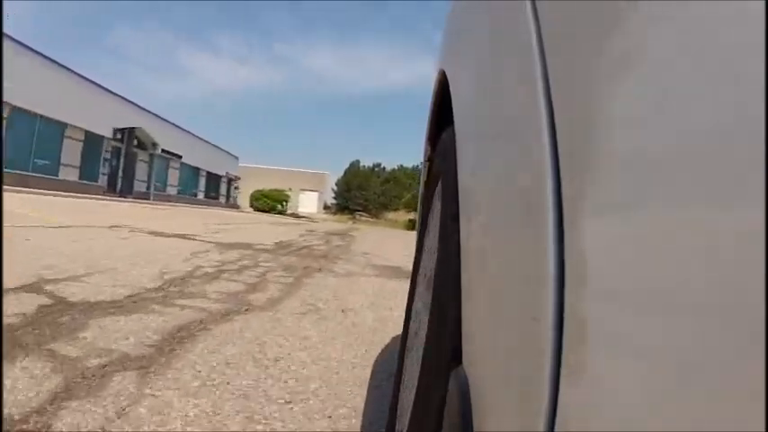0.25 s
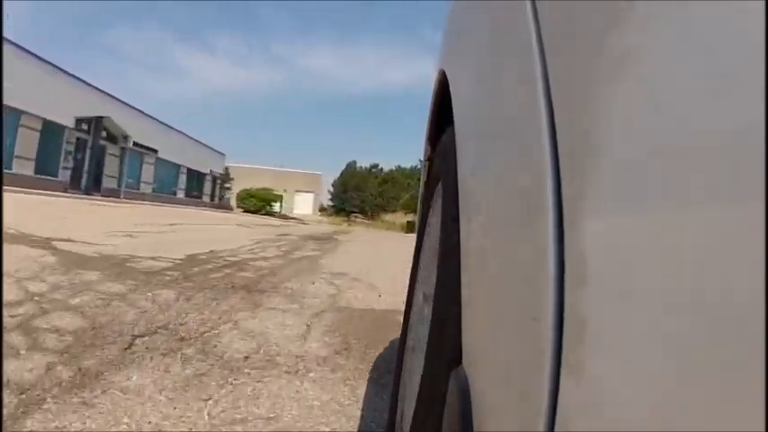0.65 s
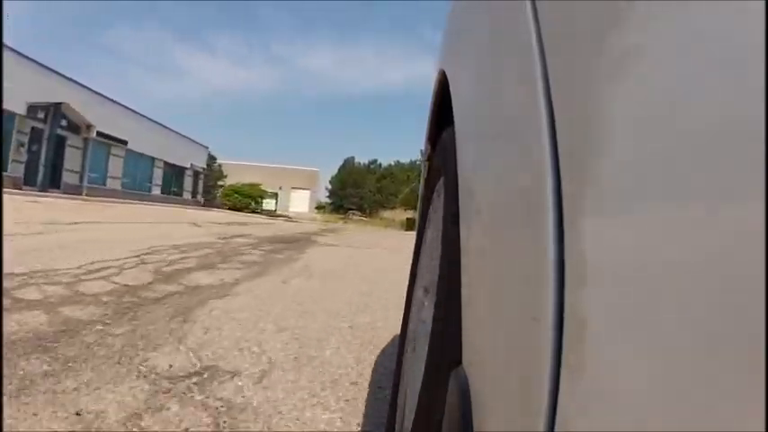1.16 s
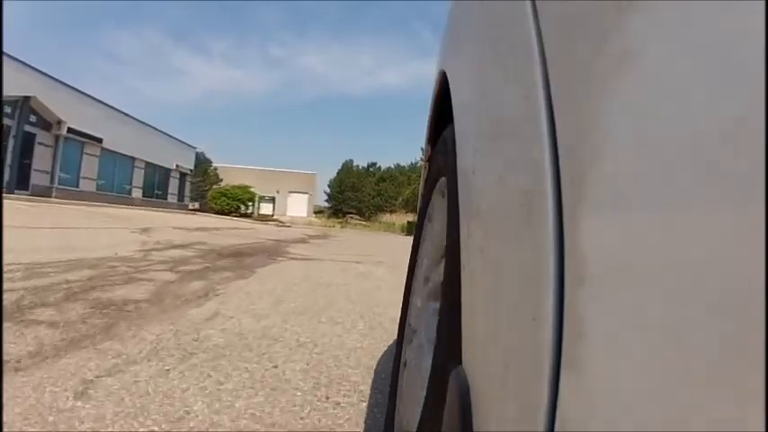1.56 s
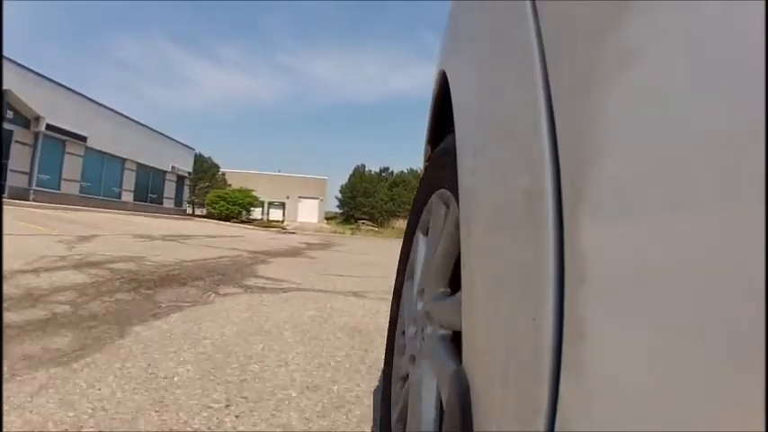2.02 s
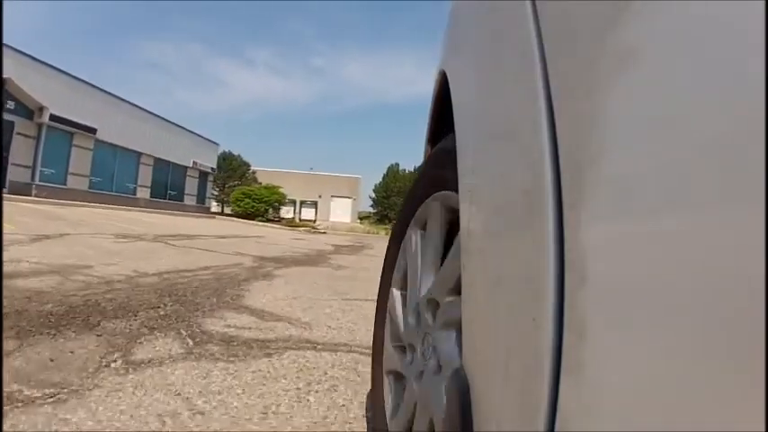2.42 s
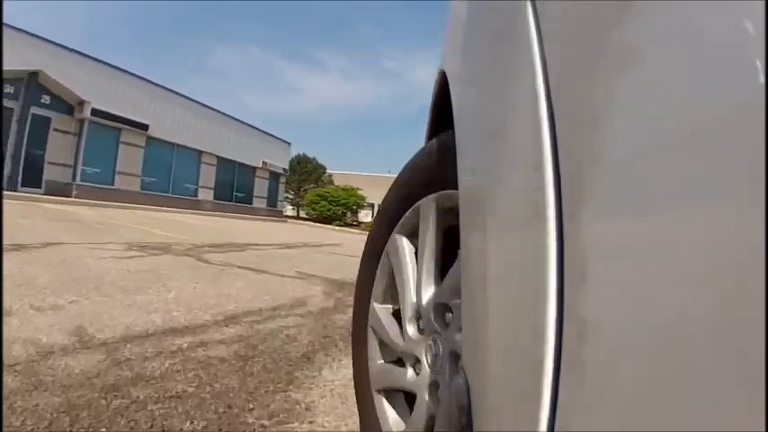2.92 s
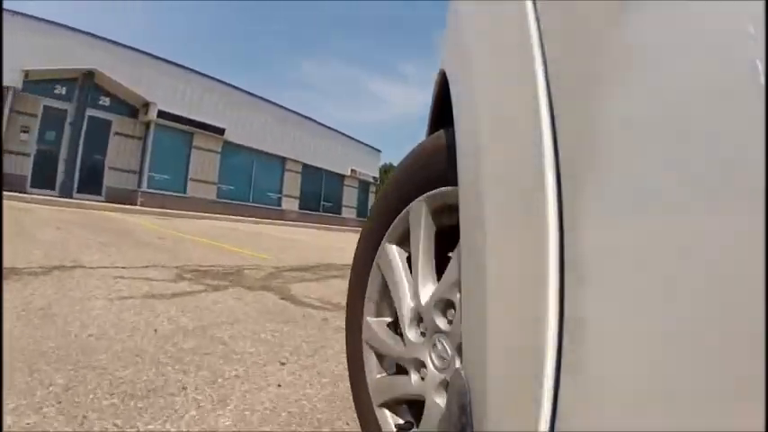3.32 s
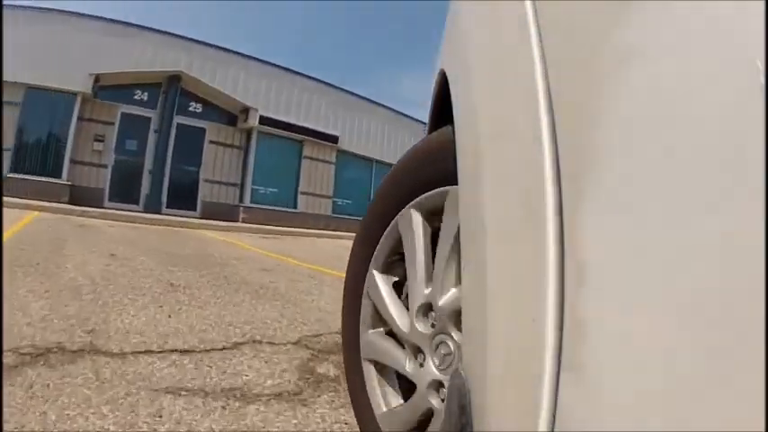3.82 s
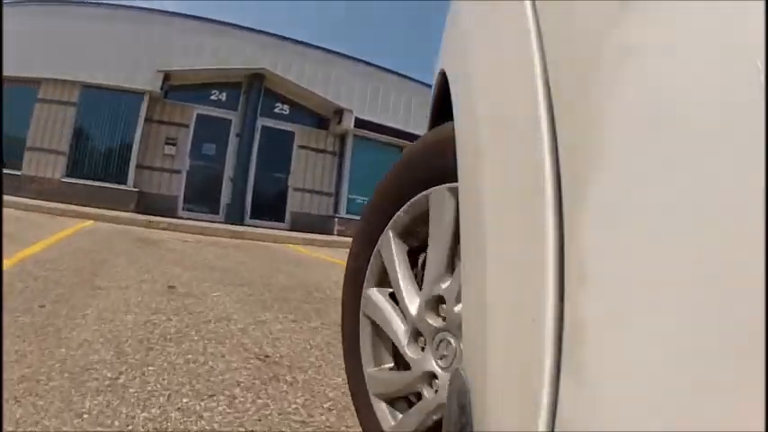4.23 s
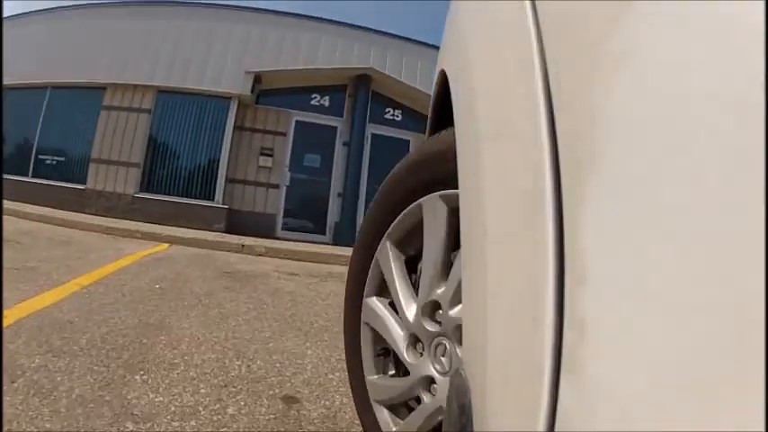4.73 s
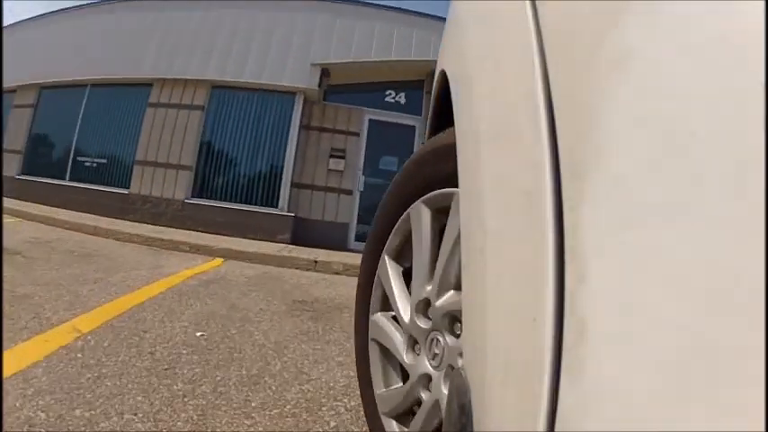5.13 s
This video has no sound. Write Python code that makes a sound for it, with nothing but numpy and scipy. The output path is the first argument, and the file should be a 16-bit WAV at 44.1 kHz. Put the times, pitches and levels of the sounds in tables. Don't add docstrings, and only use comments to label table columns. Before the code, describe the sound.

A microphone in a closed housing on a car door hears the front tyre rolling slowly over cracked asphalt outdoors. The dull rumble wavers and bumps, with gravel crackle and crunching stones. Pops against the panel begin near one second and become hardest at about 4.3 and 5 seconds, while the rumble eases and rubbing brake metal whines faintly.

```python
import sys
import numpy as np
from scipy import signal
from scipy.io import wavfile

SR = 44100
rng = np.random.default_rng(int(sys.argv[2]) if len(sys.argv) > 2 else 0)


def to_wav(s):
    ch = np.atleast_2d(s).T
    pcm = np.round(np.clip(ch, -1, 1) * 32767)
    wavfile.write(sys.argv[1], SR, pcm.astype(np.int16))


def amplitude_ratio(level_db):
    exponent = np.asarray(level_db, float) / 20
    return 10 ** exponent


N = 236860

ROLL_SHARE = [0.57, 1.56, 0.24, 0.15]


def rms_one(x):
    return x / np.sqrt(np.mean(x ** 2) + 1e-20)


def drift(rate_hz):
    pole = np.exp(-80 * np.pi * rate_hz / SR)
    slow = signal.lfilter([1], [1, -2 * pole, pole * pole], rng.standard_normal(N // 40 + 2002))
    slow = slow[2000:]
    return np.interp(np.arange(N) / 40, np.arange(len(slow)), rms_one(slow))


def band(x, low_hz, high_hz):
    return signal.sosfilt(signal.butter(2, [low_hz, high_hz], "band", fs=SR, output="sos"), x)


def mode(hz, t60_s, phase, length=8192):
    t = np.arange(length) / SR
    return np.sin(2 * np.pi * hz * t + phase) * amplitude_ratio(-60 * t / t60_s)


def add(track, start_s, sound):
    i = round(start_s * SR)
    track[i:i + len(sound)] += sound[:N - i]


def window(start_s, length_s, edge_s):
    t = np.arange(N) / SR - start_s
    return np.clip(np.minimum(t, length_s - t) / edge_s, 0, 1)


def swells(rows):
    t = np.arange(N) / SR
    lifts = [db * np.clip(1 - np.abs(t - peak_s) / half_s, 0, 1) for peak_s, db, half_s in rows]
    return np.max(lifts, axis=0)


def work_db():
    # time_s, level_db
    road_work = [(0.0, -51.5), (0.12, -53), (0.48, -54), (0.67, -55), (0.87, -54), (0.99, -56),
                 (1.56, -53.5), (1.82, -57), (2.23, -53), (2.42, -55.5), (3.22, -54.5), (3.62, -55.5),
                 (4.1, -56.5), (4.41, -55), (4.59, -56.5), (4.94, -58.5), (5.1, -60), (5.37, -59.5)]
    time_s, db = np.transpose(road_work)
    db = np.interp(np.arange(N) / SR, time_s, db)
    return db - db.mean()


def rolling():
    part_hz = [56, 95, 800, 3500]
    # pitch_hz, density_db (per Hz)
    road_colour = [(14, -12.5), (48, 0.5), (110, -6), (210, -9), (500, -18), (1820, -34), (7000, -41.5),
                   (9500, -75)]
    # peak_s, over_calm_db, half_length_s
    jolts = [(.12, 2, 0.11), (.48, -5, 0.085), (1.06, 5, .2), (1.58, 15.5, 0.16), (2.33, 12, 0.14),
             (2.59, 2, 0.064), (3.38, 19, 0.14), (3.52, 11.5, 0.14), (3.85, 10, 0.37), (4.2, 5, 0.21),
             (4.55, 7, 0.16)]
    # peak_s, over_bare_surface_db, half_length_s
    gravel_patches = [
        (.01, 12.5, 0.058),
        (.48, 7.5, 0.21),
        (1.56, 2.5, 0.3),
        (2.1, 5, 0.2),
        (5.04, 6, 0.17),
    ]
    sway, body, tread, grit = np.outer(ROLL_SHARE, work_db())
    gravel = swells(gravel_patches)
    scrub_db = 6.5 * (np.arange(N) / SR > 0.97)
    parts = np.array([sway + swells(jolts), body, tread + 0.11 * gravel, grit + gravel + scrub_db])
    parts -= parts.mean(axis=1, keepdims=True)

    impacts = rng.standard_normal((2, N)) * amplitude_ratio(2.07 * rng.exponential(1, (2, N)))
    bumps = drift(25.0)
    colour_hz, density_db = np.transpose(road_colour)
    third_octaves_hz = 20 * 2 ** (np.arange(26) / 3)
    out = 0
    for k, (low_hz, high_hz) in enumerate(zip(third_octaves_hz, third_octaves_hz[1:])):
        place = np.log(low_hz * high_hz) / 2
        colour_db = np.interp(place, np.log(colour_hz), density_db)
        nearness = [np.interp(place, np.log(part_hz), row) for row in np.eye(len(part_hz))]
        unsteady_db = (2.34 * bumps + 1.93 * drift(6.2)) * min(high_hz / 300, 1)
        gain = amplitude_ratio(colour_db + nearness @ parts + unsteady_db)
        out = out + gain * band(impacts[k % 2], low_hz, high_hz)
    return amplitude_ratio(-54.0) * rms_one(out)


def carcass():
    # pitch_hz, width_hz, level_db
    resonances = [(89.6, 9.2, 5.5), (150.6, 15.3, -1), (185.6, 19, -3), (224.2, 19.8, -2), (319, 17, -7.5),
                  (365.6, 20, -9), (442.4, 20, -12), (680, 133, -8.5), (1300, 530, -10)]
    rough = rng.standard_normal(N)
    hum = 0
    for hz, width_hz, db in resonances:
        hum = hum + amplitude_ratio(db) * rms_one(band(rough, hz - width_hz / 2, hz + width_hz / 2))
    return amplitude_ratio(ROLL_SHARE[1] * work_db() - 64) * hum


def electronics():
    # first_s, ticks (count)
    tick_runs = [(.184, 1), (.2775, 4), (.832, 1), (.972, 1), (1.082, 3), (1.484, 2), (1.7285, 2),
                 (1.982, 1), (2.09, 1), (2.1784, 1), (2.28, 2), (2.533, 2), (2.935, 1), (3.0297, 2),
                 (3.2823, 2), (3.5365, 2), (3.735, 1), (3.938, 1), (4.032, 3), (4.582, 2), (4.837, 3),
                 (5.237, 1)]
    shared = rng.standard_normal(N)
    own = band(rng.standard_normal((2, N)), 400, 15000)

    ticks = np.zeros(N)
    tick_shape = np.hanning(round(0.01 * SR))
    for first_s, count in tick_runs:
        for start_s in first_s + 0.1503 * np.arange(count):
            add(ticks, start_s, amplitude_ratio(-66 + 1.3 * rng.standard_normal()) * tick_shape)
    tick_noise = band(rng.standard_normal(N), 8600, 9700) + 0.57 * band(shared[::-1], 4000, 16000)

    burst_starts_s = np.arange(0.792, N / SR, 1.0012)
    bursts = sum(amplitude_ratio(-64) * window(start_s, 0.026, 0.002) for start_s in burst_starts_s)
    spiky = rng.standard_normal(N) * amplitude_ratio(2.5 * np.minimum(rng.exponential(1, N), 4))
    burst_noise = band(spiky, 3800, 21000)

    shared = shared + 0.22 * band(shared, 10200, 19000)
    hiss = amplitude_ratio(-72.5) * shared + amplitude_ratio(-71) * own
    return hiss + ticks * rms_one(tick_noise) + bursts * rms_one(burst_noise)


def crushes(rows, clicks_per_s, width, rise_s, tail_s):
    out = np.zeros(N)
    t = np.arange(4096) / SR
    for start_s, db, length_s, hz in rows:
        cracks = rng.standard_normal(len(t)) * (rng.random(len(t)) < clicks_per_s / SR)
        cracks[round(rise_s * SR)] = 2.7
        cracks = cracks * np.minimum(t / rise_s, 1) * np.exp(-np.maximum(t - length_s, 0) / tail_s)
        sound = band(cracks + 1e-18, hz / width, hz * width)
        add(out, start_s, amplitude_ratio(db) * sound / np.abs(sound).max())
    return out


def splinters():
    # start_s, level_db, length_s, pitch_hz
    chips = [(.004, -57, 0.014, 3600), (.02, -55.5, 0.048, 3200), (.072, -56, .004, 3800),
             (.199, -60, 0.0099, 2900), (.848, -60, .008, 2700), (.476, -60, 0.018, 2500),
             (1.116, -56, .015, 3020), (1.3295, -55, 0.0065, 3400), (1.4222, -57, .008, 2900),
             (1.599, -60, .012, 3780), (2.0258, -55, 0.022, 3960), (2.0708, -49.5, 0.024, 3970),
             (2.0883, -51, 0.0055, 2500), (2.0995, -54, .003, 3850), (4.2492, -59, 0.0091, 3140),
             (4.3325, -59, .004, 3130), (4.356, -55, .002, 3180), (4.377, -54, 0.0097, 3300),
             (4.386, -48, 0.0022, 3200), (4.988, -73, .003, 2800), (5.006, -66, 0.011, 2500),
             (5.036, -59, 0.0025, 2950)]
    return crushes(chips, clicks_per_s=1400, width=1.16, rise_s=0.00029, tail_s=0.0027)


def crunches():
    # start_s, level_db, length_s, pitch_hz
    crushed = [(.091, -51, 0.034, 634), (.471, -51, 0.02, 840), (.55, -50.5, 0.016, 660),
               (.8455, -50.5, 0.013, 1220), (1.1135, -40.5, 0.015, 694), (1.2755, -50, 0.0087, 800),
               (1.3275, -43, 0.018, 860), (1.4188, -46, 0.011, 1140), (1.495, -45.5, 0.016, 710),
               (1.53, -53, 0.042, 680), (1.575, -55, 0.026, 710), (2.215, -52.5, 0.0042, 900),
               (1.559, -44, 0.0051, 900), (2.0255, -49, 0.02, 1030), (2.09, -51, 0.023, 1190),
               (2.1168, -47, 0.014, 600), (2.248, -46, 0.017, 665), (2.41, -53.5, 0.019, 1040),
               (1.77, -58.5, 0.025, 1320), (2.615, -52, 0.0094, 900), (2.8395, -50, 0.0068, 680),
               (4.682, -57, 0.0074, 850), (5.005, -47.5, 0.01, 1300)]
    return crushes(crushed, clicks_per_s=1500, width=1.52, rise_s=0.0003, tail_s=0.0018)


def thuds():
    # start_s, level_db, length_s, pitch_hz
    lumps = [(.472, -39.5, 0.039, 283), (1.014, -39.5, 0.0045, 218), (1.46, -41.5, 0.028, 330),
             (1.487, -30.5, 0.029, 192), (1.515, -36.5, 0.015, 162), (1.55, -43, 0.026, 318),
             (1.562, -40, 0.024, 232), (2.112, -41.5, 0.014, 300), (5.004, -35, 0.006, 247),
             (2.15, -48, 0.0087, 132), (2.249, -44, 0.015, 229), (2.835, -41, 0.011, 202),
             (3.387, -40, 0.012, 206), (3.825, -44.5, 0.0087, 130), (4.36, -36, 0.0044, 200),
             (4.8, -41.5, 0.0065, 207)]
    return crushes(lumps, clicks_per_s=760, width=1.44, rise_s=0.0052, tail_s=0.0088)


def panel_hits(rows, rise_s, ring_db, low_hz):
    # pitch_hz, level_db, t60_s
    panel_modes = [(253.5, 4, 0.018), (330, -15.5, 0.036), (720, -9, 0.017), (1046, -10.5, 0.011),
                   (1536, -26, 0.027), (163, -9.5, 0.036), (77, -26.5, 0.1)]
    # pitch_multiple (ratio), level_db, t60_s
    stone_modes = [(1.002, -0.5, 0.0054), (1.36, 2, 0.0021)]
    out = np.zeros(N)
    t = np.arange(8192) / SR
    knock = sum(amplitude_ratio(db) * mode(panel_hz, t60_s, .85) for panel_hz, db, t60_s in panel_modes)
    knock = knock * (1 - np.exp(-t / rise_s))
    ring = amplitude_ratio(ring_db) * mode(6266, 0.11, 0)
    for start_s, tick_db, knock_db, hz, upper_db in rows:
        tick = 0
        for (multiple, db, t60_s), lift_db in zip(stone_modes, [0, upper_db]):
            tick = tick + amplitude_ratio(db + lift_db) * mode(hz * multiple, t60_s, 0)
        tick = band(band(tick, low_hz, 12000), low_hz, 12000)
        rattle = rms_one(band(rng.standard_normal(len(t)), 1500, 6000))
        rattle = amplitude_ratio(-33) * rattle * np.exp(-t / .009)
        stone = tick + amplitude_ratio(0.33 * upper_db) * ring + rattle
        add(out, start_s + 0.00066, amplitude_ratio(tick_db - 5) * stone + amplitude_ratio(knock_db + 1) * knock)
    return out


def snaps():
    # start_s, tick_db, knock_db, tick_pitch_hz, upper_mode_db
    glancing = [(1.0191, -41, -33, 2880, -20), (2.8362, -42.5, -58, 3240, -6),
                (3.3876, -33, -44, 3150, 9.5), (3.4005, -35, -32, 3100, -11), (3.4192, -50, -62, 3300, -2),
                (3.448, -50, -60, 3300, -1), (3.463, -49, -60, 3180, -9), (4.1657, -41.5, -28, 3180, 5),
                (4.3114, -21, -13.5, 2760, -1), (4.3893, -22.5, -15.5, 2970, -13),
                (4.798, -37.5, -41, 3200, 8), (4.8282, -45.5, -30.5, 2860, -2), (4.903, -48, -57, 3280, -3),
                (4.9532, -18, -13.5, 3130, -8), (5.0289, -24, -17.5, 3150, -10)]
    return panel_hits(glancing, rise_s=0.0087, ring_db=-29, low_hz=1750)


def blows():
    # start_s, tick_db, knock_db, tick_pitch_hz, upper_mode_db
    square_on = [
        (1.0535, -35, -36, 2750, -25),
        (4.3154, -13.5, -17, 2840, 3.4),
        (4.9631, -18.5, -20.5, 2850, 3.5),
    ]
    return panel_hits(square_on, rise_s=.00005, ring_db=-26, low_hz=630)


def whines():
    # start_s, end_s, pitch_hz, width_hz, level_db, waver_db
    brake_tones = [
        (4.979, 5.035, 3736, 10, -64, 1.5),
        (5.07, 5.45, 5235, 110, -77, 3.5),
        (5.06, 5.2, 5620, 130, -82, 3),
    ]
    out = 0
    for start_s, end_s, hz, width_hz, db, waver_db in brake_tones:
        phase = 2 * np.pi * np.cumsum(hz + width_hz / 2 * drift(79)) / SR
        strength = amplitude_ratio(db + waver_db * drift(29)) * window(start_s, end_s - start_s, 0.009)
        out = out + strength * np.sin(phase)
    return out


def scene():
    stones = splinters() + crunches() + thuds() + snaps() + blows()
    car = rolling() + carcass() + stones + whines()
    housing = signal.butter(5, 6340, fs=SR, output="sos")
    return signal.sosfilt(housing, car) + electronics()


def band_limit(x):
    return signal.sosfilt(signal.butter(12, 15730, fs=SR, output="sos"), x)


def record(dry):
    steep = signal.ellip(10, .3, 50, 15300, fs=SR, output="sos")
    return band_limit(signal.sosfilt(steep, dry))


dry = scene()
out = record(dry)
to_wav(out)
```